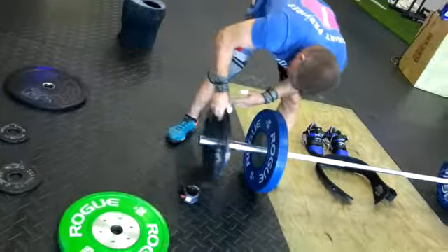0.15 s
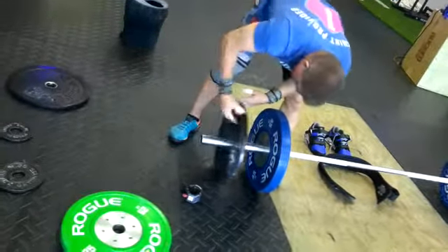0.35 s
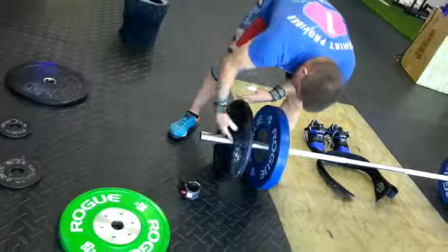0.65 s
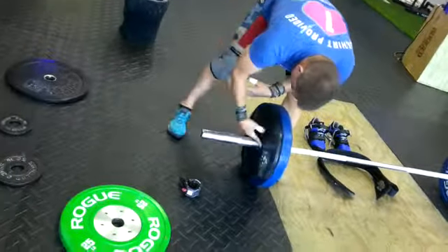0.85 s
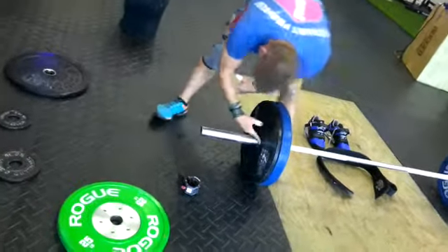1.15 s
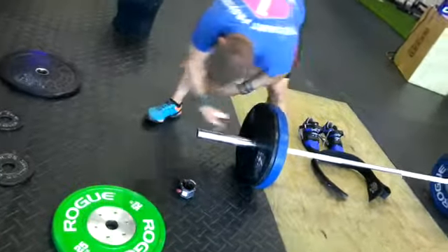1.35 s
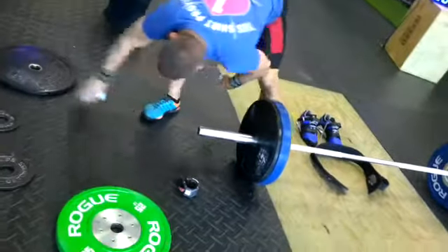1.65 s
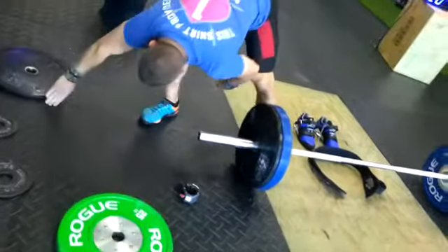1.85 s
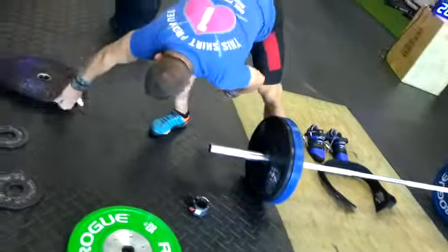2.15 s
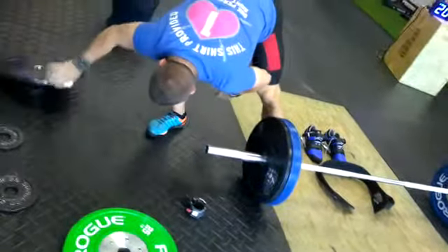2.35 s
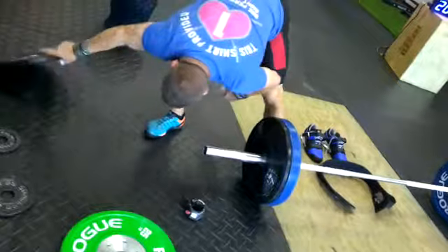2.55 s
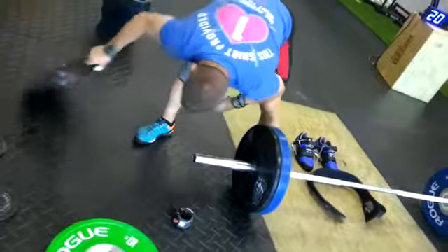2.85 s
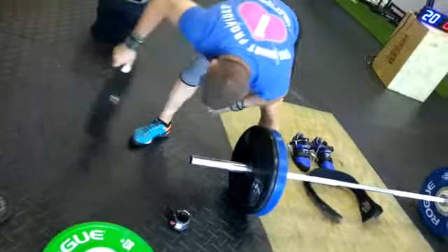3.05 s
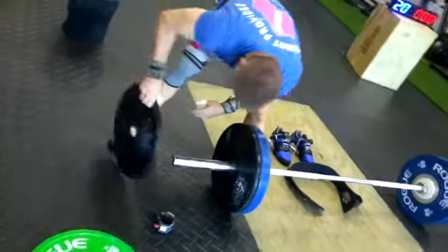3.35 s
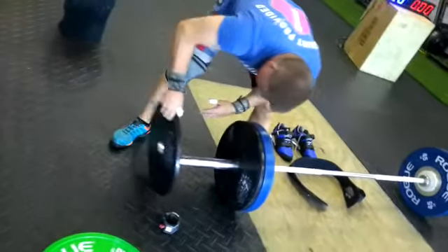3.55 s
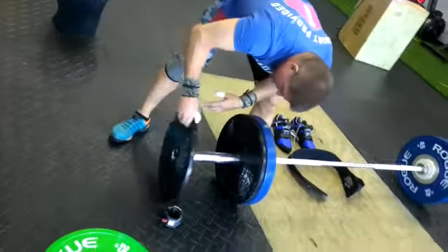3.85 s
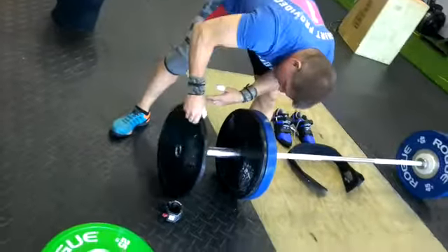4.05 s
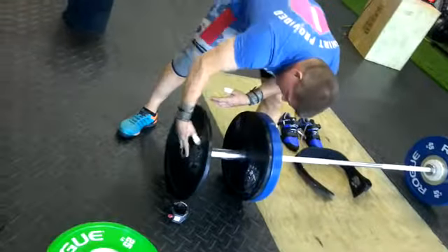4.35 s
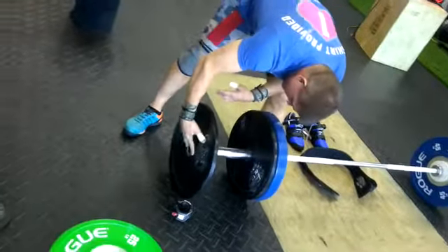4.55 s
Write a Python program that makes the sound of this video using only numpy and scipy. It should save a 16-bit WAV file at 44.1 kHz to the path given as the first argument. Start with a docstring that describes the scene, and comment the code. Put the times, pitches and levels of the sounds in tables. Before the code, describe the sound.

A gym hall with low, steady air noise, heard fairly close. From 0 to 0.3 s a plate's steel hub ticks and scrapes faintly on a barbell sleeve. A low grooved whirr marks a nudge at 0.3-0.5 s; from 0.7 s a fast shove zips upward in pitch with bright hiss. At 0.87 s it slams into loaded plates: a very loud, blunt, dense clank, short in itself, clipping the microphone, with a bright hall echo fading over nearly a second. Soft foot thuds follow around 1.4-1.7 s and 2.1 s, and a faint palm brush at 2.24 s. Rubber scuffs the floor, swelling to 2.96 s with dull bumps at 2.87-2.99 s, then small clicks at 3.1-3.2 s. After faint foot thuds near 3.6 s, the second hub knocks the sleeve at 3.7 s and clanks in a cluster at 3.9-3.95 s, with brief steely scrapes until about 4.2 s and a faint one at 4.4 s.

```python
"""Gym hall: a rubber bumper plate is pushed along the grooved steel sleeve of a barbell and slams into
the loaded plates. A second plate is dragged off the rubber floor, knocks on the sleeve and is wiggled on.
Impacts are sums of decaying modes plus a noise crack; rubbing is stick-slip friction; the grooves sing at
the rate they are passed. The hall rings after each blow; the slam overloads the microphone and its limiter."""
import sys
import numpy as np
from scipy import signal
from scipy.io import wavfile
from scipy.ndimage import uniform_filter1d

SR = 44100
rng = np.random.default_rng(int(sys.argv[2]) if len(sys.argv) > 2 else 0)


def dump(signal):
    """Clip the signal to [-1, 1] and save it as 16-bit WAV at the path in sys.argv[1]."""
    limited = np.clip(np.atleast_2d(signal).T, -1, 1)
    pcm = np.round(limited * 32767).astype(np.int16)
    wavfile.write(sys.argv[1], SR, pcm)


N = 207415
TIME = np.arange(N) / SR
RING_TIME = TIME[:SR // 4]  # a quarter of a second for each blow


def amp(db):
    """Level: decibels convert to a pressure ratio."""
    return 10 ** (np.asarray(db) / 20)


def evened(x):
    """Normalisation: scales to rms 1."""
    return x / np.sqrt(np.mean(x ** 2) + 1e-20)


def read(points, hz):
    """Interpolation of a table along a logarithmic frequency axis."""
    f, value = np.transpose(points)
    return np.interp(np.log(hz + 1), np.log(f + 1), value)


def add(mix, s, sound):
    """Superposition: mixes a sound in at time s, in place."""
    part = mix[max(round(s * SR), 0):][:len(sound)]
    part += sound[:len(part)]


def coloured(x, spectrum):
    """Minimum-phase filtering by a (f/Hz, level/dB) table: nothing sounds before its cause."""
    size = 4096
    hz = abs(np.fft.fftfreq(size, 1 / SR))
    log_gain = np.log(amp(read(spectrum, hz)))
    # the Hilbert transform of the log gain gives the minimum phase
    response = np.fft.ifft(np.exp(np.conj(signal.hilbert(log_gain)))).real[:size // 2]
    return signal.fftconvolve(x, response)[:len(x)]


def noise(spectrum):
    """Stationary random pressure: coloured noise of rms 1."""
    return evened(coloured(rng.standard_normal(N), spectrum))


def wander(size):
    """Random modulation: smooth chance of rms 1, averaged twice over size samples."""
    smooth = uniform_filter1d(rng.standard_normal(N), size)
    return evened(uniform_filter1d(smooth, size))


def dying(t60, t=RING_TIME):
    """Exponential damping: amplitude falls 60 dB in t60 seconds."""
    return np.exp(-np.log(1000) * t / t60)


def swell(peak_s, db, swell_db_per_s, fade_db_per_s):
    """Build-up and release: the gain is exponential on either side of its peak."""
    before = (peak_s - TIME) * swell_db_per_s
    after = (TIME - peak_s) * fade_db_per_s
    return amp(db - np.maximum(before, after))


def burst(spectrum, t60):
    """Broadband impact: a coloured puff of noise that starts near rms 1 and dies."""
    fade = dying(t60)
    puff = coloured(rng.standard_normal(len(fade)) * fade, spectrum)
    return evened(puff) * np.sqrt(np.mean(fade ** 2))


def taps(rows, spectrum, t60):
    """Heavily damped impact: dead little blows with no ring."""
    out = np.zeros(N)
    for s, db in rows:
        add(out, s, amp(db) * burst(spectrum, t60))
    return out


def blows(rows, modes, crack, crack_db, crack_t60, detune):
    """Modal superposition: each blow rings damped modes and adds a short crack, shaped by its force."""
    out = np.zeros(N)
    for s, bass, middle, treble in rows:
        # how squarely the blow lands sets the spectrum of its force
        force = [(450, bass), (1000, middle), (2800, middle), (6000, treble)]
        # the contact loads the modes differently each time
        shifts = 1 + detune * rng.uniform(-1, 1, len(modes))
        ring = np.zeros(len(RING_TIME))
        for k, (hz, db, t60) in enumerate(modes):
            level = amp(db + read(force, hz)) * (-1) ** k  # alternate modes start in opposite phase
            ring += level * dying(t60) * np.sin(2 * np.pi * hz * shifts[k] * RING_TIME)
        add(out, s, ring + amp(crack_db) * coloured(burst(crack, crack_t60), force))
    return out


def friction(spectrum, slips_per_s, spread_db, patchy_db):
    """Stick-slip: many tiny slips of uneven size; resonances come and go as the contact point moves."""
    size = amp(spread_db * np.minimum(rng.exponential(1, N), 4))
    happens = rng.random(N) < slips_per_s / SR
    slips = size * rng.choice([-1, 1], N) * happens
    z = signal.stft(slips, SR, nperseg=512)[2]
    # random gains, smoothed over frequency and then over time
    patches = uniform_filter1d(rng.standard_normal(z.shape), size=4, axis=0)
    patches = evened(uniform_filter1d(patches, size=6, axis=1))
    patchy = signal.istft(z * amp(patchy_db * patches))[1][:N]
    return evened(coloured(patchy, spectrum))


# plate meets plate, hub first and then the whole face:
# t/s, bass level/dB, middle level/dB, treble level/dB
SLAM_BLOWS = [(.8548, -17.5, -6, -12), (.8645, -20, -9, -22), (.8697, 8, 3.5, 1)]
# modes of the stack of plates: f/Hz, level/dB, t60/s
STACK_MODES = [(63, -27.5, .05), (119, -20, 0.09), (179.5, -23, .08), (320.3, 0, .05), (390, -5, .045),
               (545.5, 1, 0.043), (663, -7.5, 0.062), (770, -14.5, .04), (843, -8.5, 0.05),
               (1042, -4.5, .05), (1250, -7, 0.11), (1380, -7.5, .05), (1515, -8.5, 0.07), (1920, -19, .03),
               (2600, -24.5, 0.022)]
# crack of the stack: f/Hz, level/dB
STACK_CRACK_SPECTRUM = [(60, -21.5), (200, -8), (400, 1.5), (650, 5.5), (1000, -4), (1450, -1),
                        (2200, -8.5), (3500, -12), (6000, -17.5), (10000, -23), (15000, -38.5)]


def slam():
    """Modal excitation by impact: the first plate hits the loaded stack, whose modes die quickly."""
    return blows(SLAM_BLOWS, STACK_MODES, STACK_CRACK_SPECTRUM, crack_db=-1.5, crack_t60=0.069, detune=0.0073)


FULL_SPEED = 3200  # grooves per second
# resonances of the sleeve, crossed by the groove harmonics: f/Hz, level/dB
SLEEVE_RESONANCES = [(850, -40), (1000, -12), (1100, -24), (1750, -30), (1980, -1), (2250, -36),
                     (2600, -14), (3200, -16), (4000, -24), (5500, -24), (6000, -9), (6540, -5),
                     (6800, -19), (9500, -16), (13000, -30)]


def grooves(speed, jitter=.022, flicker_db=2.5, count=4):
    """Periodic excitation: the groove rate is the pitch; faster travel strengthens the upper harmonics."""
    phase = 2 * np.pi * np.cumsum(speed * (1 + jitter * wander(size=35))) / SR
    db, growth = -21, 12  # dB at full speed, dB per doubling of speed for each harmonic number
    doublings = np.log2(speed / FULL_SPEED)
    tone = np.zeros(N)
    for k in range(1, count + 1):
        # the tone flares where a harmonic crosses a resonance
        level = db + k * growth * doublings + read(SLEEVE_RESONANCES, k * speed)
        tone += amp(level) * np.sin(k * phase)
    return tone * amp(flicker_db * wander(size=130))


# the tilted hub binds and scrapes on the sleeve:
# t/s, length/s, hum level/dB, rasp level/dB, chatter level/dB
SCRAPE_EVENTS = [(0, .28, -54, -59, -60), (.028, .016, -51, -52, -48), (.08, .018, -51, -53, -47),
                 (.158, .014, -63, -63, -46), (.185, .018, -55, -42, -53), (.35, .12, -61, -72, -75),
                 (3.93, .04, -47, -44, -47.5), (3.995, .03, -45, -58, -62), (4.04, .06, -58, -63, -63),
                 (4.12, .045, -55, -72, -70), (4.385, .03, -55, -70, -85)]


def scrape(rise_s=.008, t60=.06):
    """Intermittent contact: the tilted hub bites, holds and lets go; gives hum, rasp and chatter gains."""
    gains = np.zeros((3, N))
    for s, length, *dbs in SCRAPE_EVENTS:
        t = TIME[:round((length + t60) * SR)]
        shape = np.minimum(t / rise_s, 1) * dying(t60, np.maximum(t - length, 0))
        for gain, db in zip(gains, dbs):
            add(gain, s, amp(db) * shape)
    return gains


# speed of the plate along the sleeve, a nudge and then a shove home: t/s, groove rate/(1/s)
NUDGE_SPEED = [(.28, 650), (.33, 970), (.37, 1050), (.42, 1100), (.49, 500)]
SHOVE_SPEED = [(.68, 450), (.73, 1150), (.755, 1860), (.786, 2080), (.816, 2980), (.853, 3370)]
# spectra of the juddering plate, the rasp, the hiss and the scraped steel: f/Hz, level/dB
HUM_SPECTRUM = [(100, -22), (175, -14), (220, -13), (275, -8), (320, 0), (365, -13), (700, -24),
                (2000, -60)]
RASP_SPECTRUM = [(150, -20), (320, -8), (600, -7), (950, -7), (1300, 1), (2200, -9), (3200, -10),
                 (4800, -20), (9000, -45)]
HISS_SPECTRUM = [(2000, -35), (4800, -12), (6300, -1), (7500, -3), (9400, 0), (11500, -6), (15000, -24)]
CHATTER_SPECTRUM = [(2500, -30), (3100, 1), (3400, -15), (5100, -15), (5560, -2), (6100, -10), (8000, 0),
                    (8600, -9), (9300, -.5), (10200, -10), (11500, -13), (15000, -27)]


def slide():
    """Sliding friction: hum, rasp and hiss grow with speed, hiss fastest; the hub chatters where it binds."""
    speed = np.ones(N)  # never zero, so that its logarithm exists
    for push in (NUDGE_SPEED, SHOVE_SPEED):
        speed += np.interp(TIME, *np.transpose(push), left=0, right=0)
    doublings = np.log2(speed / FULL_SPEED)
    # dB at full speed + dB per doubling of speed
    hum = amp(-58 + 5 * doublings)
    rasp = amp(-37 + 12.5 * doublings)
    hiss = amp(-33.5 + 18 * doublings)
    judder, grind, chatter = scrape()
    return ((hum + judder) * friction(HUM_SPECTRUM, slips_per_s=2000, spread_db=1.0, patchy_db=1.0)
            + (rasp + grind) * friction(RASP_SPECTRUM, slips_per_s=6000, spread_db=1.5, patchy_db=1.5)
            + hiss * friction(HISS_SPECTRUM, slips_per_s=1800, spread_db=2.5, patchy_db=4.0)
            + chatter * friction(CHATTER_SPECTRUM, slips_per_s=1500, spread_db=2.5, patchy_db=3.5)
            + grooves(speed))


# the steel hub knocks on the sleeve: t/s, bass level/dB, middle level/dB, treble level/dB
KNOCK_BLOWS = [(.001, -42, -45.5, -50), (.024, -45, -45, -49), (.078, -42, -37, -36),
               (3.682, -34, -45, -48), (3.694, -43.5, -25, -54), (3.6975, -41, -39, -36.5),
               (3.8955, -42.5, -37, -45), (3.9075, -30.5, -38, -44), (3.9295, -33, -34, -31.5),
               (3.936, -29, -29.5, -37.5), (3.953, -42, -39, -33)]
# modes of hub and sleeve: f/Hz, level/dB, t60/s
HUB_MODES = [(210, -11.5, 0.2), (322, 0, 0.088), (630, -11.5, 0.044), (770, -10, 0.039), (1130, -5, .025),
             (1460, -3, .025), (3108, -13, .11), (5470, -19.5, .12), (5660, -16.5, .1), (7870, -12, .05),
             (7570, -17.5, 0.082), (8100, -12, 0.085), (7960, -12, 0.12), (10700, -18.5, 0.038)]
# crack of the hub: f/Hz, level/dB
HUB_CRACK_SPECTRUM = [(50, -15), (150, 4), (250, 1), (450, -3), (800, 0.5), (1400, -2.5), (2300, -9),
                      (3100, -2.5), (4400, -11), (6500, -8.5), (8100, -2.5), (9500, -8), (11500, -13),
                      (15000, -28)]


def knocks():
    """Modal excitation of steel: the hub clanks on the sleeve as a plate is fitted on."""
    return blows(KNOCK_BLOWS, HUB_MODES, HUB_CRACK_SPECTRUM, crack_db=-1.5, crack_t60=0.04, detune=.012)


# a hand brushes the rim, then rubber rubs the floor:
# t/s of the peak, level/dB, swell rate/(dB/s), fade rate/(dB/s)
BRUSH_SWELL = (2.24, -56.5, 130, 135)
DRAG_SWELL = (2.96, -49.5, 62, 175)
# bumps of the rim on the floor, and clicks of the grip as the plate swings up: t/s, level/dB
BUMP_TAPS = [(2.87, -46), (2.886, -44), (2.934, -35.5), (2.95, -35), (2.986, -33.5)]
CLICK_TAPS = [(3.11, -52), (3.161, -42)]
# spectra of the palm, the rubber and the click: f/Hz, level/dB
PALM_SPECTRUM = [(300, -8), (800, -1), (2000, -4), (3000, -7), (5800, -9.5), (8000, -26), (15000, -38)]
RUBBER_SPECTRUM = [(50, -28), (100, -20), (220, -10), (330, 0), (520, 0), (900, -3), (1150, -13),
                   (1450, -12), (1900, -28), (5000, -39), (12000, -46)]
CLICK_SPECTRUM = [(200, -5), (900, 0), (1600, 0), (2800, -5), (5000, -8), (8000, -17), (14000, -33)]


def lift():
    """Soft friction and damped impact: a hand brushes the rubber rim, which scuffs and bumps on the floor."""
    brush = swell(*BRUSH_SWELL) * friction(PALM_SPECTRUM, slips_per_s=5000, spread_db=1.5, patchy_db=1.5)
    scuff = swell(*DRAG_SWELL) * friction(RUBBER_SPECTRUM, slips_per_s=600, spread_db=2.2, patchy_db=1.5)
    bumps = taps(BUMP_TAPS, RUBBER_SPECTRUM, t60=0.022)
    clicks = taps(CLICK_TAPS, CLICK_SPECTRUM, t60=.03)
    return brush + scuff + bumps + clicks


# soft thuds of feet on the floor: t/s, level/dB, f/Hz
FOOT_THUDS = [(1.445, -46, 130), (1.53, -51, 140), (1.64, -48, 148), (2.135, -54.5, 140), (3.615, -51, 110),
              (3.675, -48, 95), (3.96, -49, 120)]


def feet(rise_s=.009):
    """Near-critical damping: a soft push swells and dies in the floor."""
    out = np.zeros(N)
    u = RING_TIME / rise_s
    for s, db, hz in FOOT_THUDS:
        add(out, s, amp(db) * u * np.exp(1 - u) * np.sin(2 * np.pi * hz * RING_TIME))
    return out


# reverberation time of the hall: f/Hz, t60/s
HALL_DECAY = [(80, .6), (180, 0.84), (600, 0.73), (1500, 0.82), (3500, .92), (7000, 0.88), (14000, .84)]
# colour of the hall's echoes: f/Hz, level/dB
HALL_SPECTRUM = [(60, -28), (120, -12), (165, 1), (250, -3.5), (330, -3.5), (400, -1.5), (520, -1.5),
                 (660, 2.5), (1000, -5.5), (1500, -3.5), (2500, -1.7), (4000, .5), (8000, -2.3),
                 (14000, -6)]


def hall(x, build_s=.016):
    """Diffuse reverberation: dense echoes build up, then each band dies at its own rate."""
    hz, t, z = signal.stft(rng.standard_normal(SR), SR, nperseg=512)
    decay = dying(read(HALL_DECAY, hz)[:, None], t)
    tail = signal.istft(z * decay, SR, nperseg=512)[1]
    tail = tail * (1 - np.exp(-(TIME[:len(tail)] / build_s) ** 2))
    response = coloured(tail / np.linalg.norm(tail), HALL_SPECTRUM)
    return signal.fftconvolve(x, response)[:N]


# steady air of the gym: f/Hz, level/dB
AIR_SPECTRUM = [(15, -31), (25, -1), (79, -3), (113, -10.5), (152, -3), (183, -7.5), (297, -7),
                (399, -13.5), (482, -9.5), (684, -12.5), (1500, -13), (1800, -18.5), (12000, -25.5),
                (15500, -26)]


def air(level_db=-61):
    """Stationary background noise: the steady air of the gym."""
    return amp(level_db) * noise(AIR_SPECTRUM)


def scene(count=4):
    """Superposition of direct and reverberant fields over the steady air."""
    rubbing, floor = slide(), lift() + feet()
    # a struck plate radiates a different pattern towards each wall, so its echoes blend into a smooth wash
    washes = [hall(amp(-3.0) * slam() + amp(-6.0) * knocks()) for _ in range(count)]
    clang_echo = sum(washes) / np.sqrt(count)
    rub_echo = hall(amp(-11.5) * rubbing + amp(-6) * floor)
    return (slam() + knocks() + rubbing + floor + clang_echo + rub_echo + air())[None]


CEILING = .72  # amplitude at which the waveform clips
EDGE_HZ = 15750  # treble above this is cut


def record(dry, threshold_db=0.5, recovery_db_per_s=85, attack_s=.006):
    """Limiting and clipping: the gain ducks too late for the slam, then recovers while the hall rings."""
    peak_db = 20 * np.log10(abs(dry[0]) + 1e-9)
    fall = TIME * recovery_db_per_s
    held_db = np.maximum.accumulate(peak_db + fall) - fall  # peaks held, sinking at the recovery rate
    over_db = np.maximum(held_db - threshold_db, 0)
    lag = np.exp(-1 / (attack_s * SR))
    duck_db = signal.lfilter([1 - lag], [1, -lag], over_db)
    clipped = np.clip(dry / amp(duck_db), -CEILING, CEILING)
    lowpass = signal.firwin(511, EDGE_HZ, window=("kaiser", 9), fs=SR)
    return signal.oaconvolve(clipped, lowpass[None], "same")


dry = scene()
out = record(dry)
dump(out)
```